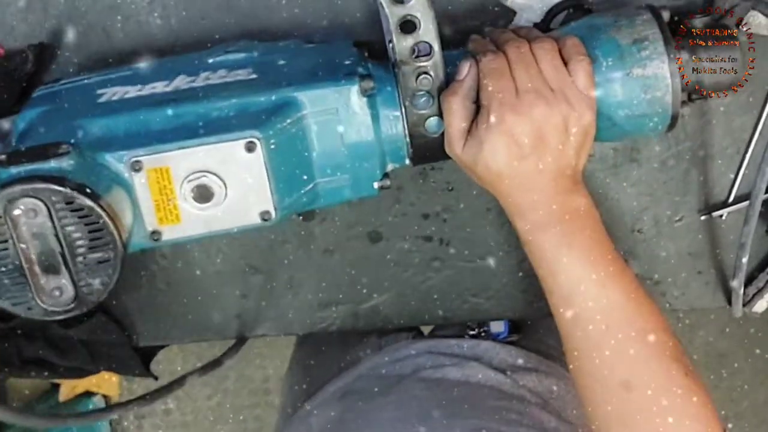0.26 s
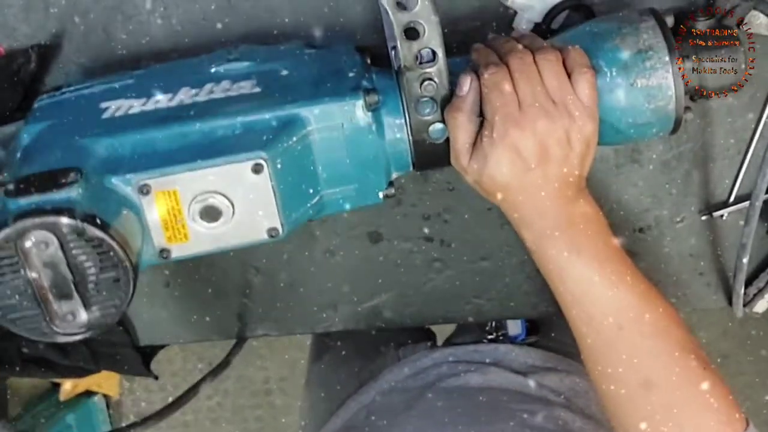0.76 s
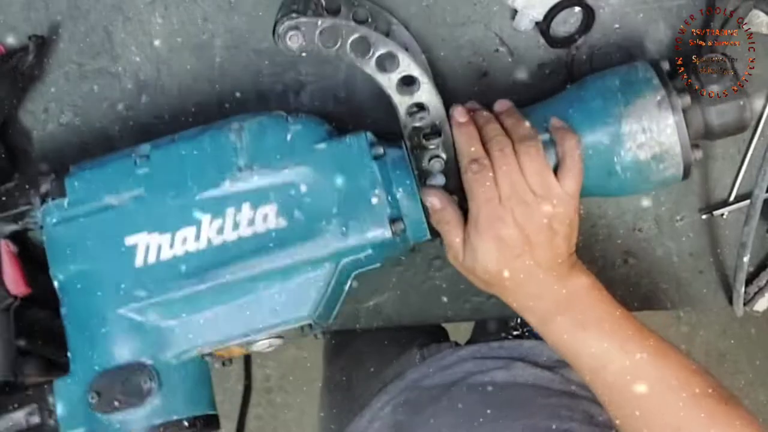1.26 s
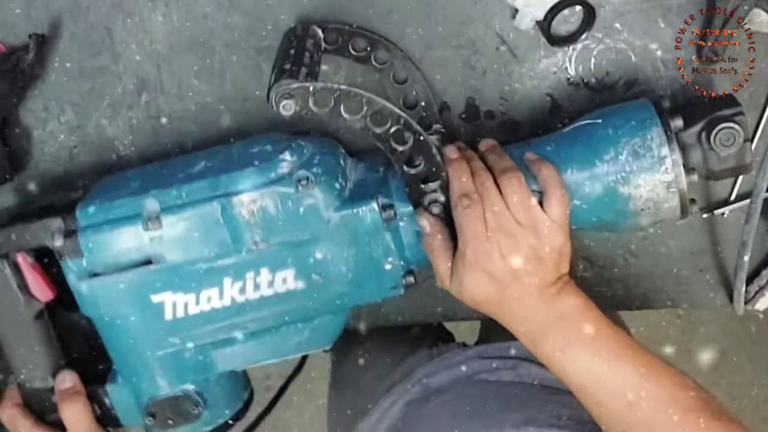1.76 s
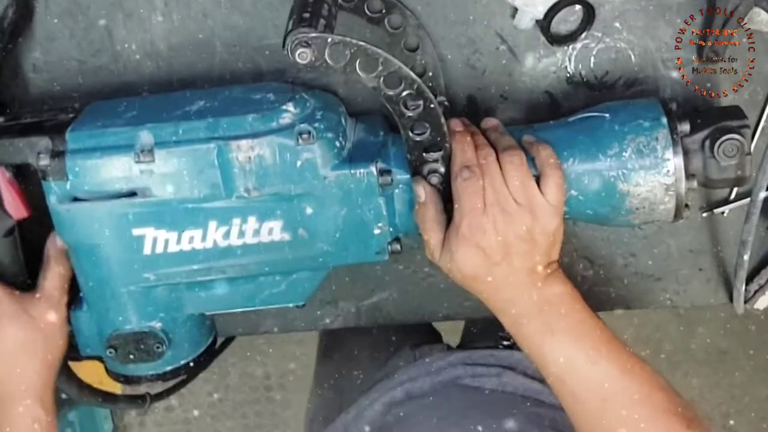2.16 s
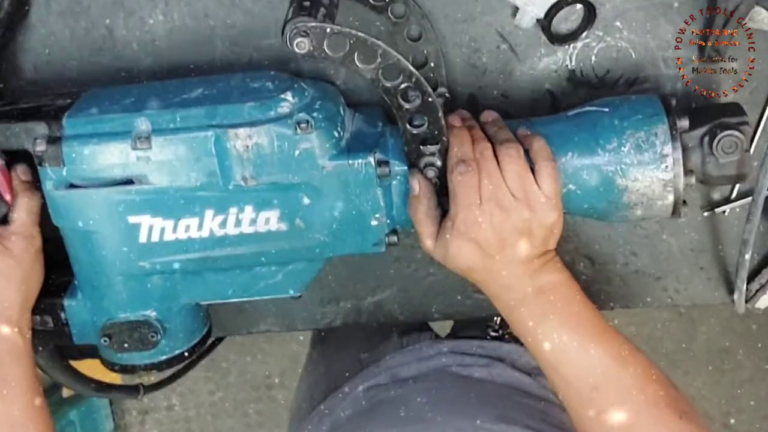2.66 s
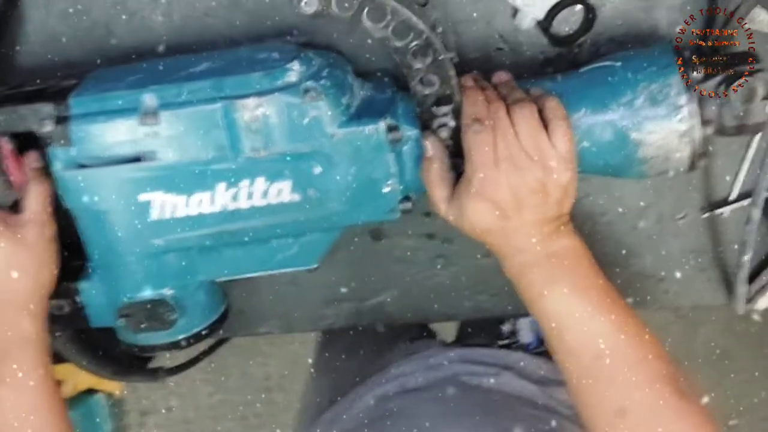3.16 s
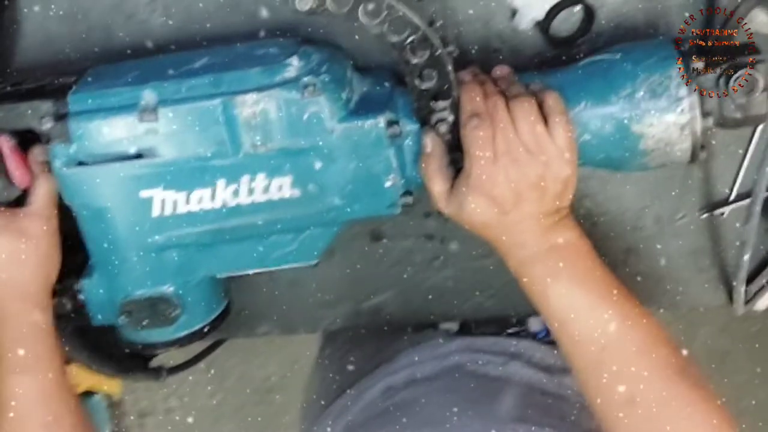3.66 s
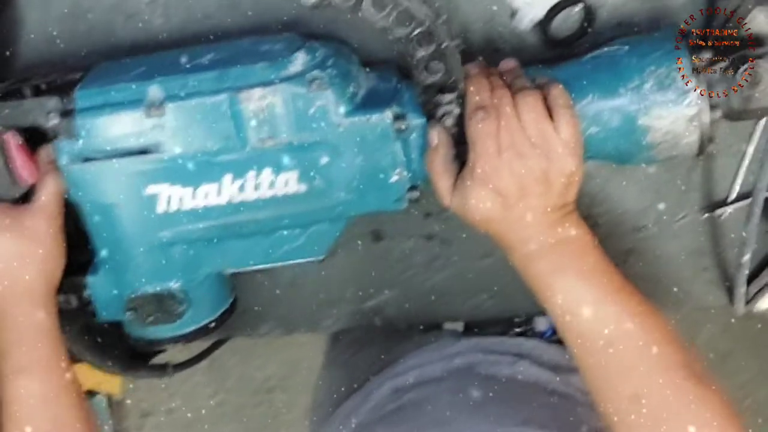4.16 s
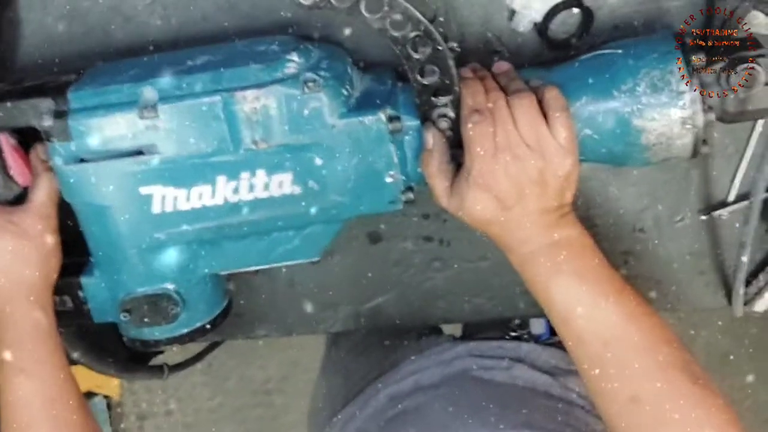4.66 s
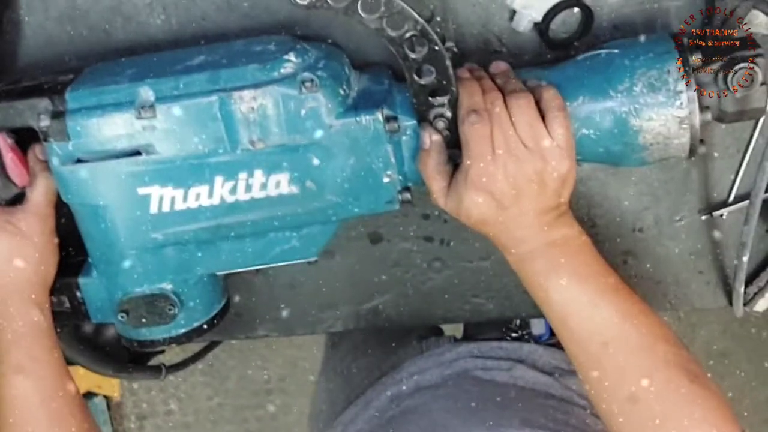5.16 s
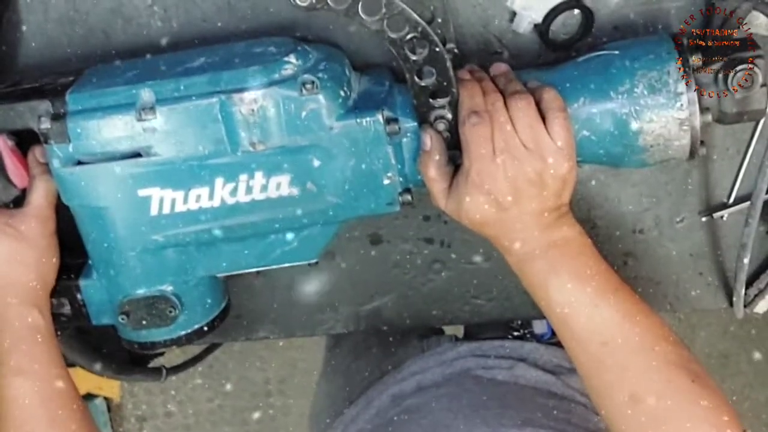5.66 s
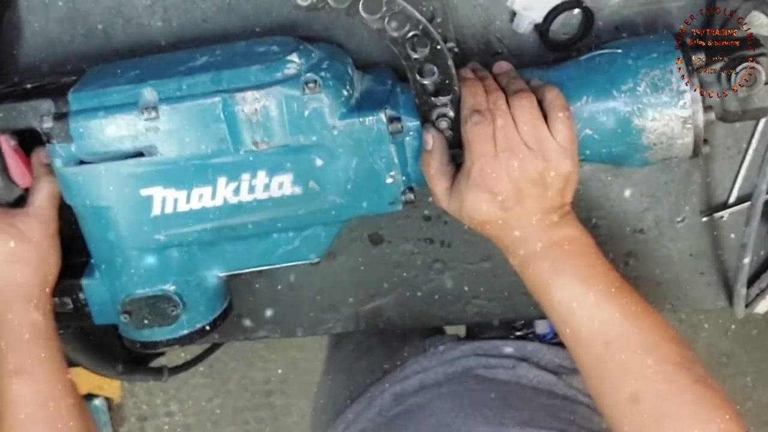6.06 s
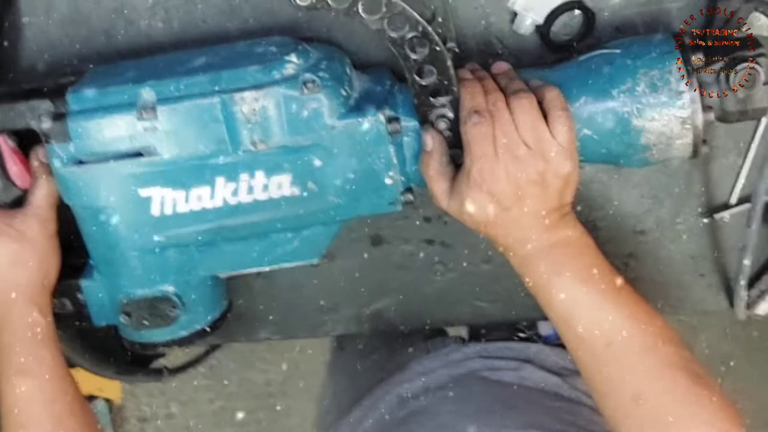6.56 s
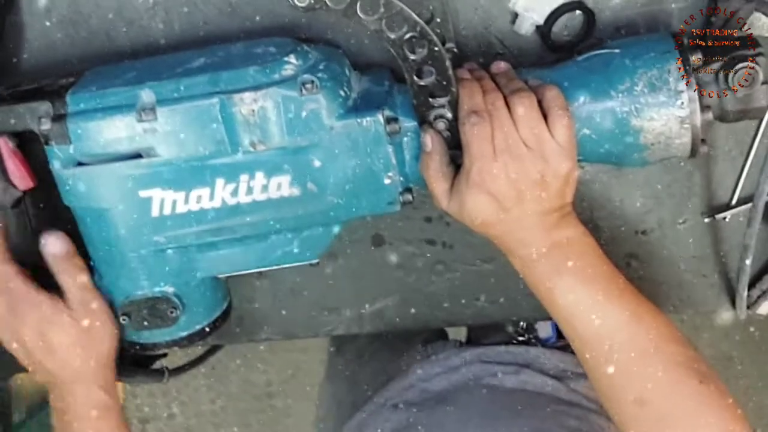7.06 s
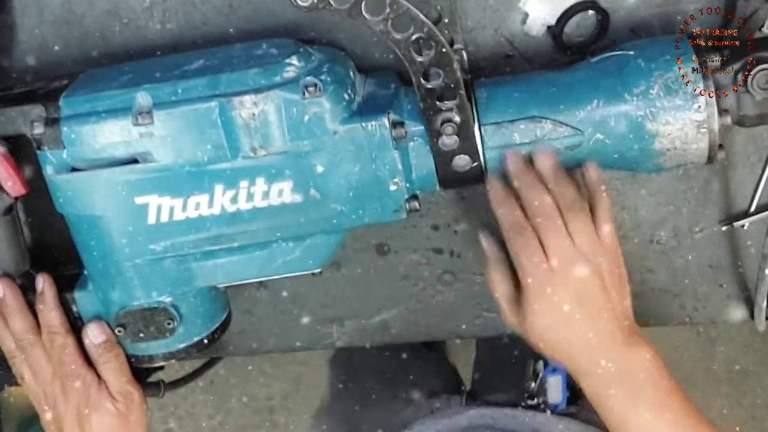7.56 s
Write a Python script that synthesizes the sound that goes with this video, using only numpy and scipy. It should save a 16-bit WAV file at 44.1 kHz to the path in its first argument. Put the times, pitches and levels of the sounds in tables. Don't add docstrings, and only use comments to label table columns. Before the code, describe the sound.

Close in a small workshop, a heavy electric demolition hammer is already spinning and coasts down, its gear clatter slowing into separate turns with a brief dry squeak. It is rolled over with thumps on a steel bench, then the trigger snaps and it roars up, is pulled again while turning, sags, and gets one last hard blip before slowing to a stop. Close stereo microphones with short room reflections.

```python
import sys
import numpy as np
from scipy import signal
from scipy.fft import rfft, irfft, next_fast_len
from scipy.io import wavfile
from scipy.ndimage import uniform_filter1d, map_coordinates

SR = 44100
rng = np.random.default_rng(int(sys.argv[2]) if len(sys.argv) > 2 else 0)


def wrap_up_sound(samples):
    columns = np.atleast_2d(samples).T
    tamed = np.clip(columns, -1, 1)
    steps = np.round(tamed * 32767).astype(np.int16)
    wavfile.write(sys.argv[1], SR, steps)


def convert_level_to_amplitude(level_db):
    exponent = np.asarray(level_db, float) / 20
    return 10 ** exponent


N = 344411

# teeth/Hz, loaded level/dB, depth/dB, casing/dB rel, gear case/dB rel
GEAR_BY_SPEED = [(0, -63, 3, 2, -1.5), (120, -44.5, 12, 0, -4), (274, -29.5, 8.5, -.5, -7.5),
                 (420, -25, 8, -4, -6), (690, -22.5, 6.5, -11, -2.5), (1090, -22.5, 7.5, -12, 1.5),
                 (1450, -22.5, 5.5, -12, 3), (1700, -22, 4.5, -10.5, 4.5)]
# teeth/Hz, barrel/dB rel, whine/dB rel, fan/dB, bench rattle/dB
SINGING_BY_SPEED = [(0, -25, -10, -74, -44.5), (151, -29, -13, -56.5, -45.5),
                    (333, -6.5, -7.5, -49.5, -42.5), (500, -14, -7, -45.5, -45),
                    (910, -6.5, -6, -40.5, -44.5), (1300, -4, -5, -35, -39), (1476, -3.5, -1.5, -33.5, -34),
                    (1657, -6, -0.5, -32, -20.5)]
# t/s, half length/s, load/dB, barrel ring/dB
HARD_TURNS = [(0.027, 0.034, 1, -1), (.81, 0.039, 0, 4.5), (1.094, 0.029, 4.5, 1), (1.27, .06, 0.5, -6),
              (1.55, .06, -3.5, -3), (1.676, 0.061, 10, -2), (2.734, 0.11, 1, 1), (3.07, 0.083, 1, 1),
              (5.143, .05, 0.5, 4.5), (5.284, 0.06, -1, -5), (5.46, 0.093, 3.5, -1),
              (5.703, 0.15, -0.5, -10), (5.909, 0.012, 3, 0), (5.966, .02, 2.5, 2), (7.2, .06, 0.5, 0),
              (7.38, 0.11, -2, -2)]
SURGE_S = .3


def unit(x):
    return x / np.sqrt(np.mean(x ** 2) + 1e-20)


def along(points, hz):
    f, v = np.transpose(points)
    return np.interp(np.log(hz + 1), np.log(f + 1), v)


def curves(rows):
    s, *cols = np.transpose(sorted(map(tuple, rows)))
    return [np.interp(np.arange(N) / SR, s, c) for c in cols]


def wobble(rate):
    knots = rng.standard_normal(int(N * rate / SR) + 4)
    return map_coordinates(knots, [np.arange(N) * rate / SR])


def swell(s, half):
    return np.exp(-((np.arange(N) / SR - s) / half) ** 2)


def filtered(x, response):
    m = next_fast_len(N + SR // 2)
    return irfft(rfft(x, m) * response(np.fft.rfftfreq(m, 1 / SR)), m)[..., :N]


def coloured(x, spectrum):
    return unit(filtered(x, lambda hz: convert_level_to_amplitude(along(spectrum, hz))))


def ringing(modes, hz):
    return sum((-1) ** k * convert_level_to_amplitude(db) * 1j * hz * width / (centre * centre - hz * hz + 1j * hz * width)
               for k, (centre, width, db) in enumerate(modes))


def taps(rate_hz, scatter, spread_db):
    turns = np.cumsum(rate_hz) / SR
    whole = np.arange(1, int(turns[-1]))
    luck = rng.standard_normal((len(whole), 2))
    at = np.searchsorted(turns, whole + scatter * luck[:, 0])
    return unit(np.bincount(at, convert_level_to_amplitude(spread_db * luck[:, 1]), N + 1)[:N])


def patchy(x, depth_db):
    z = signal.stft(x, nperseg=512)[2]
    field = rng.standard_normal(z.shape[1:])
    field = uniform_filter1d(uniform_filter1d(field, size=2, axis=0), size=5, axis=1)
    patched = z * convert_level_to_amplitude(depth_db * unit(field))
    power_ratio = np.mean(abs(patched) ** 2, (0, 1)) / np.mean(abs(z) ** 2, (0, 1))
    return signal.istft(patched / np.sqrt(power_ratio), nperseg=512)[1][:, :N]


def motor():
    # t/s, teeth/Hz
    coast = [(0, 1318.6), (.3, 1037.4), (.66, 698.7), (1.1, 385), (1.35, 256.1), (1.75, 86.8), (1.95, 0)]
    first_run = [(2.62, -0.0), (2.71, 894.4), (2.79, 1186.4), (2.95, 1258.2), (3.07, 1412.3),
                 (3.24, 1670.5), (3.44, 1714.1), (3.6, 1496.4)]
    second_run = [(3.8, 1291.6), (4.1, 1662.3), (4.32, 1318.5), (4.6, 1012.6), (4.89, 737.8), (5.2, 480),
                  (5.45, 311.9), (5.83, 216)]
    third_run = [(5.86, 700), (5.92, 985), (6.07, 1508), (6.3, 1174.2), (6.55, 879.5), (7.02, 473.6),
                 (7.24, 380.4), (7.5, 200), (7.7, 0)]
    trigger_s = [-1, 2.627, 3.8, 5.834]
    # starting surge/dB, level/dB, depth factor, barrel ring/dB
    pull_settings = [
        (4, -1, 1.17, 7),
        (5.5, 0, 0.95, -1),
        (0.5, -.5, 0.95, 0),
        (4.5, 1, 1.04, -2.5),
    ]
    teeth_per_turn, first_turn = 68.5, .2463
    mesh_hz, = curves(coast + first_run + second_run + third_run)
    turns = first_turn + np.cumsum(mesh_hz) / SR / teeth_per_turn
    t = np.arange(N) / SR
    rows = np.c_[trigger_s, pull_settings].T
    start, *pull = rows[:, np.searchsorted(rows[0], t) - 1]
    since = t - start
    kick_hz = 1000 * (1 - np.exp(-since / .008)) * np.exp(-since / 0.15)
    return mesh_hz, turns, since, np.maximum(mesh_hz, kick_hz), pull


def by_speed(rows, felt_hz):
    hz, *cols = np.transpose(rows)
    return [np.interp(felt_hz, hz, c) for c in cols]


def per_turn(turns):
    return np.interp(turns - .4, np.arange(200), rng.standard_normal(200))


def load():
    cushion = [(0, 0.04), (.05, 0), (.09, 0.47), (.3, 0.97), (.42, 0.88), (.58, 0.4), (.75, 0.37),
               (1, 0.09)]
    _, turns, since, felt_hz, (surge_db, level_db, deep, _) = motor()
    full_db, depth_db = by_speed(GEAR_BY_SPEED, felt_hz)[:2]
    share = np.interp(turns % 1, *np.transpose(cushion))
    settled = 1 - 0.97 * np.exp(-(since / 0.15) ** 2) * (surge_db > 1)
    full_db = full_db + level_db + surge_db * np.exp(-(since / SURGE_S) ** 2) + 0.79 * per_turn(turns)
    full_db = full_db + sum(db * swell(s, half) for s, half, db, _ in HARD_TURNS)
    crisp = 1.12
    return full_db - (1 - share) * depth_db * deep * settled * crisp


def squeeze(load_db):
    return np.clip(load_db - uniform_filter1d(load_db, size=SR // 8), -9, 9)


def gear_teeth(load_db):
    mesh_hz = motor()[0]
    teeth = np.array([taps(mesh_hz, scatter=.35, spread_db=4.0) for _ in range(3)])
    teeth = teeth + 0.25 * taps(mesh_hz / 9, scatter=.5, spread_db=4.5)
    grind = .9 * rng.standard_normal((3, N))
    return unit(teeth + grind) * convert_level_to_amplitude(load_db + .25 * squeeze(load_db) - .6 + .8 * wobble(90))


def slack_clacks():
    # t/s, peak/dB, decay t60/s
    clack_events = [(0.5781, -13, 0.021), (1.0324, -20.5, 0.037), (1.5434, -29.5, 0.054),
                    (2.0364, -18, 0.1), (2.127, -43, 0.033), (2.6299, -5, 0.068), (2.651, -12, 0.038),
                    (5.235, -16.5, 0.019), (5.8277, -15, 0.023), (5.8396, -7.5, 0.029), (5.8601, -5, 0.035),
                    (5.9404, -22, 0.043), (6.5934, -11, 0.034), (6.766, -13, 0.026)]
    clacks = np.zeros((3, N))
    t = np.arange(SR // 5) / SR
    for s, db, t60 in clack_events:
        start = round(s * SR)
        burst = convert_level_to_amplitude(db - 6.5 - 60 * t / max(t60, .004)) * rng.standard_normal((3, len(t)))
        clacks[:, start:start + len(t)] = burst
    return clacks


def rotor_whine(load_db):
    mesh_hz, turns, since, felt_hz, pull = motor()
    whine_db = by_speed(SINGING_BY_SPEED, felt_hz)[1] + 2.5 * per_turn(turns)
    whine_db = whine_db - 2.7 * pull[0] * np.exp(-(since / 0.11) ** 2)
    bend = 1 - 0.00427 * squeeze(load_db) + 0.01606 * wobble(60)
    phase = 2 * np.pi * np.cumsum((.935 * mesh_hz + 45) * bend) / SR
    tone = np.sin(phase) + 0.64 * np.sin(2 * phase)
    return convert_level_to_amplitude(load_db + 1.3 * squeeze(load_db) + whine_db - 5.5 + 2.2 * wobble(45)) * tone


def hammer(load_db):
    # f/Hz, width/Hz, level/dB
    housing_modes = [(259, 20, -2), (441, 20, 1), (602, 26, -5), (799.6, 20, -0.5), (1310, 36, -17),
                     (1630, 56, 0.5), (1946, 23, -6), (2437, 20, 0.5), (3400, 20, -18), (3980, 31, -4),
                     (4344, 47, -29), (4795, 160, -2), (5459, 41, -3), (8260, 440, 3)]
    # f/Hz, level/dB
    casing_colour = [(150, -29), (300, -7), (450, 0), (700, -1), (900, -3), (1200, -53)]
    body_colour = [(500, -26.5), (900, -4), (1300, -0.5), (2500, 3), (3400, -5), (4000, -49)]
    gear_colour = [(2900, -17.5), (3600, 1), (4600, 1.5), (5580, -2), (5750, -10.5), (9000, -19.5),
                   (15000, -22.5)]
    # f/Hz, width/Hz, level/dB
    cylinder_modes = [(5500, 90, 0)]
    # f/Hz, width/Hz, level/dB
    barrel_modes = [(2680, 52, 0)]
    _, turns, since, felt_hz, pull = motor()
    casing_db, gear_db = by_speed(GEAR_BY_SPEED, felt_hz)[2:]
    gear_db = gear_db - 0.41 * pull[0] * np.exp(-since / SURGE_S)
    barrel_db = by_speed(SINGING_BY_SPEED, felt_hz)[0] + pull[-1] + 1.6 * per_turn(turns)
    barrel_db = barrel_db + sum(db * swell(s, half) for s, half, _, db in HARD_TURNS)
    cylinder_db = 0.51 * casing_db + 0.4 * pull[-1] - 14 - 0.12 * squeeze(load_db)

    def shell(colour):
        return lambda hz: (ringing(housing_modes, hz) + convert_level_to_amplitude(-7.5)) * convert_level_to_amplitude(along(colour, hz))

    parts = ((shell(casing_colour), casing_db),
             (shell(body_colour), -1.2),
             (shell(gear_colour), gear_db),
             (lambda hz: ringing(cylinder_modes, hz), cylinder_db),
             (lambda hz: ringing(barrel_modes, hz), barrel_db - 1.5 + .55 * squeeze(load_db)))
    grid_hz = np.fft.rfftfreq(4096, 1 / SR)

    def struck(x):
        return sum(filtered(x * convert_level_to_amplitude(db), ring) / np.sqrt(np.mean(abs(ring(grid_hz)) ** 2))
                   for ring, db in parts)

    clacks = slack_clacks()
    clatter = patchy(struck(gear_teeth(load_db)), depth_db=2.6)
    return clatter + struck(clacks) + .18 * clacks + rotor_whine(load_db)


def fan(load_db):
    # f/Hz, density/dB per Hz
    air_colour = [(3410, -5.5), (5800, -4), (6410, -7), (6960, -0.5), (7980, -2), (8670, -7), (10400, -8),
                  (12300, -3.5), (15600, -24)]
    mesh_hz, _, since, felt_hz, (surge_db, pull_db, *_) = motor()
    hiss = rng.standard_normal((3, N)) + .2 * taps(np.full(N, 900.), scatter=.6, spread_db=4)
    hiss = hiss + .1 * taps(mesh_hz / 11, scatter=.6, spread_db=2)
    air_db = by_speed(SINGING_BY_SPEED, felt_hz)[2] + 0.37 * pull_db
    air_db = air_db + 1.6 * surge_db * np.exp(-since / SURGE_S)
    level_db = air_db + 0.54 * squeeze(load_db) + 1.1 * wobble(25) + 3
    return convert_level_to_amplitude(level_db) * patchy(coloured(hiss, air_colour), depth_db=4.0)


def bench_shake(load_db):
    # f/Hz, width/Hz, level/dB
    top_modes = [(114.8, 20.5, -1.5), (183.5, 9.5, -5), (230.5, 36, -5.5), (270.7, 27.6, -2),
                 (330, 132, -10), (481, 43, -8)]
    # f/Hz, level/dB
    sway_colour = [(25, -45), (48, -16), (66, 0), (82, -12), (105, -35), (200, -100)]
    # t/s, half length/s, rattle/dB, sway/dB
    nudges = [(.25, 0.087, -45, -56), (.95, .08, -42.5, -42), (1.657, 0.15, -43, -42),
              (2.083, 0.063, -27, -35), (2.278, .2, -38.5, -27), (2.624, 0.084, -50, -30),
              (2.896, .08, -44, -36), (3.25, 0.11, -40, -34), (4.138, 0.044, -28, -38),
              (4.3, 0.17, -37.5, -33.5), (5, .08, -53, -36), (5.867, 0.086, -44, -43),
              (6.155, 0.067, -42, -35), (6.9, 0.24, -47.5, -43), (7.78, .1, -51, -44)]
    rattle = convert_level_to_amplitude(by_speed(SINGING_BY_SPEED, motor()[0])[3])
    rattle = rattle + sum(convert_level_to_amplitude(db) * swell(s, half) for s, half, db, _ in nudges)
    sway = convert_level_to_amplitude(-48.5) + sum(convert_level_to_amplitude(db) * swell(s, half) for s, half, _, db in nudges)
    blows = taps(np.full(N, 120.), scatter=0.221, spread_db=4.5) * convert_level_to_amplitude(1.08 * squeeze(load_db))
    chatter = filtered(blows, lambda hz: ringing(top_modes, hz) / (1 + 1j * hz / 600) ** 2)
    return rattle * unit(chatter) + sway * convert_level_to_amplitude(-2.0) * coloured(rng.standard_normal(N), sway_colour)


def murk():
    # f/Hz, density/dB per Hz
    room_colour = [(200, -28), (350, -8.5), (600, -3), (1100, -7.5), (2100, -12), (3500, -17.5),
                   (6500, -21.5), (10000, -25), (15600, -28)]
    return convert_level_to_amplitude(-51.5 + 1.5 + 2.0 * wobble(7.8)) * coloured(rng.standard_normal((2, N)), room_colour)


def chirr():
    period_s = .0553
    beat = (np.arange(N) / SR - 2.24) / period_s % 1
    puffs = convert_level_to_amplitude(-60 * beat * period_s / .04) * rng.standard_normal((2, N))
    return convert_level_to_amplitude(-69) * coloured(puffs, [(2500, -40), (5000, 0), (15600, -5)])


def squeaks():
    # t/s, half length/s, f/Hz, level/dB
    chirps = [
        (.62, .03, 8000, -50),
        (.735, 0.039, 7400, -34),
        (1.02, .03, 8600, -51),
        (1.09, .04, 5600, -43),
    ]
    t = np.arange(N) / SR
    rough = np.cumsum(wobble(500)) * 2 * np.pi * 90 / SR
    out = np.zeros(N)
    for s, half, hz, db in chirps:
        phase = 2 * np.pi * hz * (t - s) * (1 - .15 * (t - s)) + rough
        out += convert_level_to_amplitude(db + 2.5 * wobble(83)) * swell(s, half) * np.sin(phase)
    return out


def knocks():
    # t/s, peak/dB, f/Hz, t60/s, plate boom/dB rel
    knock_events = [(1.265, -26, 570, 0.12, -8), (1.448, -20.5, 259, 0.15, -15),
                    (1.573, -27, 420, 0.081, -8), (1.685, -19.5, 382, 0.063, -17),
                    (1.785, -23.5, 120, 0.067, -20), (1.841, -27, 106.5, 0.14, -17),
                    (1.992, -14.5, 98, 0.09, -22), (2.027, -9.5, 124, 0.26, -1.5),
                    (2.195, -10, 118, 0.053, -20), (2.374, -13.5, 262, 0.092, -18),
                    (2.398, -10, 146, 0.052, -22), (2.597, -18.5, 132, 0.09, -17),
                    (5.478, -23, 276, 0.1, -19), (5.727, -24, 405, 0.11, -8), (5.753, -22, 398, 0.082, -19),
                    (7.209, -21.5, 414, 0.09, -17), (7.388, -29, 400, 0.082, -10),
                    (7.424, -23, 459, 0.17, -14), (7.459, -26, 399, 0.13, -21),
                    (7.723, -27, 110.8, 0.083, -15), (7.765, -32, 121, 0.11, 1.5)]
    # f/Hz, level/dB, t60/s
    plate_modes = [(118, 1, 0.19), (262, 2, 0.084), (382, 4, 0.075), (470, -5, 0.055), (620, -16, 0.11),
                   (780, -12, 0.11), (1145, -23, 0.26), (1870, -26, .2)]
    out = np.zeros(N)
    t = np.arange(SR // 2) / SR
    soft = 1 - np.exp(-t / 0.0015)
    for s, db, hz, t60, boom_db in knock_events:
        plate = sum(convert_level_to_amplitude(level + boom_db - 60 * t / ring_s) * np.sin(2 * np.pi * f * t)
                    for f, level, ring_s in plate_modes)
        thump = convert_level_to_amplitude(-60 * t / max(t60, .01)) * np.sin(2 * np.pi * hz * t)
        scrape = convert_level_to_amplitude(-38 - 60 * t / .05) * rng.standard_normal(len(t))
        start = round(s * SR)
        out[start:][:len(t)] += (convert_level_to_amplitude(db - 2.0) * soft * (plate + thump + scrape))[:N - start]
    return out


def ports(x):
    # f/Hz, share 0-1
    likeness = [(100, 0.76), (500, 0.93), (900, 0.96), (1500, 0.28), (5500, 0.48), (6500, 0.072),
                (15000, 0.092)]
    # f/Hz, level/dB
    lean = [(60, -12), (110, 6), (200, -7), (380, 1.5), (700, -2), (1290, 1.5), (2380, 0.5), (4400, 1),
            (8120, 1.5), (15000, -1)]
    lag = 6.87
    side = np.array([[.5], [-.5]])
    share = lambda hz: np.clip(along(likeness, hz), 0, 1)
    common = filtered(x[0], lambda hz: np.sqrt(share(hz)) * np.exp(2j * np.pi * hz * side * lag / SR))
    own = filtered(x[1:], lambda hz: np.sqrt(1 - share(hz)))
    return filtered(common + own, lambda hz: convert_level_to_amplitude(side * along(lean, hz)))


def shop(x):
    # f/Hz, t60/s
    decay = [(200, .25), (1500, .28), (10000, .1)]
    # f/Hz, level/dB
    wet_colour = [(30, -16), (70, -8), (250, -10.5), (1000, -11), (9000, -11)]
    hz, t, z = signal.stft(rng.standard_normal((2, SR // 3)), SR, nperseg=256)
    tail = signal.istft(z * convert_level_to_amplitude(-60 * t / along(decay, hz)[:, None]), SR, nperseg=256)[1]
    wet = signal.fftconvolve(x[None], tail / np.linalg.norm(tail[0]), axes=1)[:, :N]
    return filtered(wet, lambda f: convert_level_to_amplitude(along(wet_colour, f)))


def scene():
    load_db = load()
    tool = hammer(load_db) + fan(load_db)
    top = bench_shake(load_db) + knocks()
    wide = convert_level_to_amplitude(-11) * filtered(top, lambda hz: np.array([[1j], [-1j]]) / (1 + (hz / 220) ** 2))
    heard = ports(tool) + top + wide + shop(tool[0] + top)
    bearing = ports(np.tile(squeaks(), (3, 1)))
    return convert_level_to_amplitude(-1.17) * (heard + murk() + chirr() + bearing)


def roll_off(x):
    return signal.sosfilt(signal.butter(12, 15780, fs=SR, output="sos"), x)


def record(dry):
    heard = filtered(dry, lambda hz: (hz < 15780) * (1j * hz / (35 + 1j * hz)) ** 2)
    heard = heard / (1 + abs(heard / .95) ** 6) ** (1 / 6)
    return roll_off(heard)


dry = scene()
out = record(dry)
wrap_up_sound(out)
```